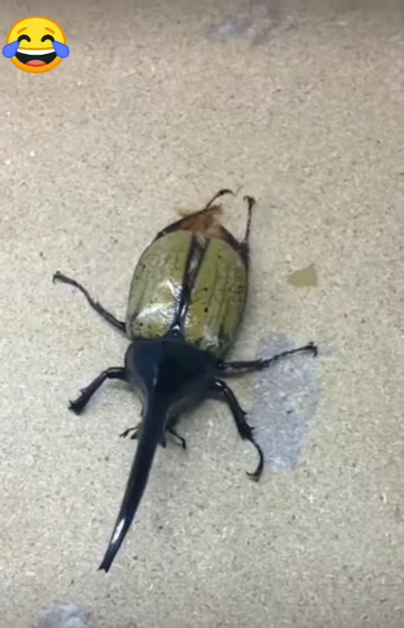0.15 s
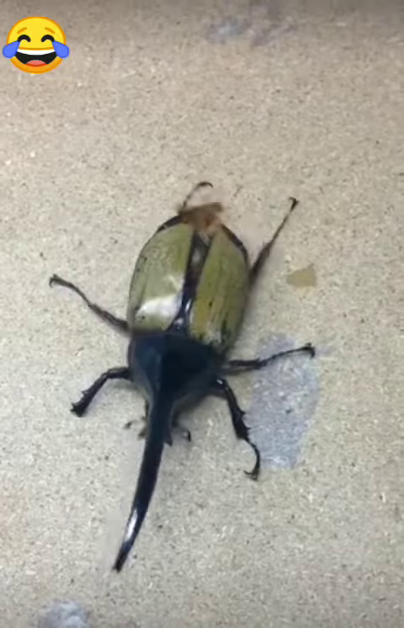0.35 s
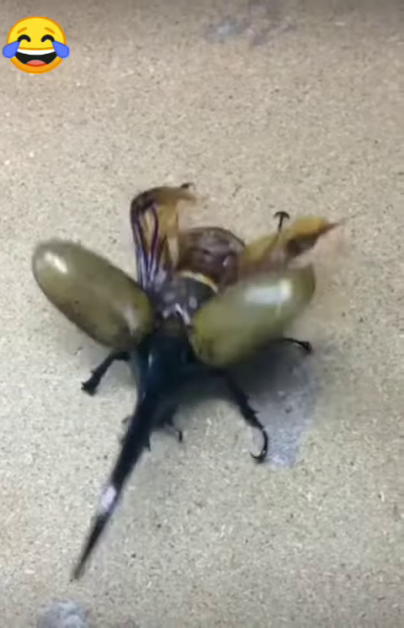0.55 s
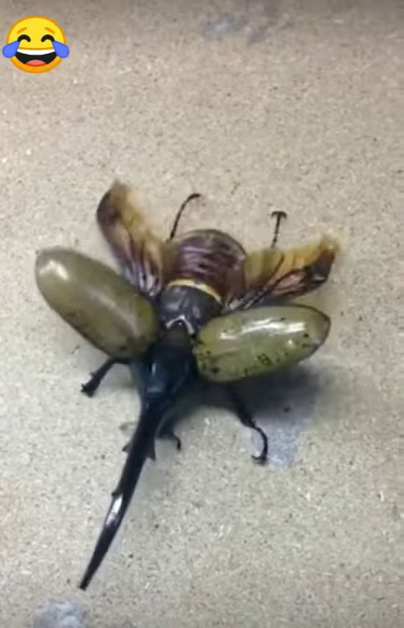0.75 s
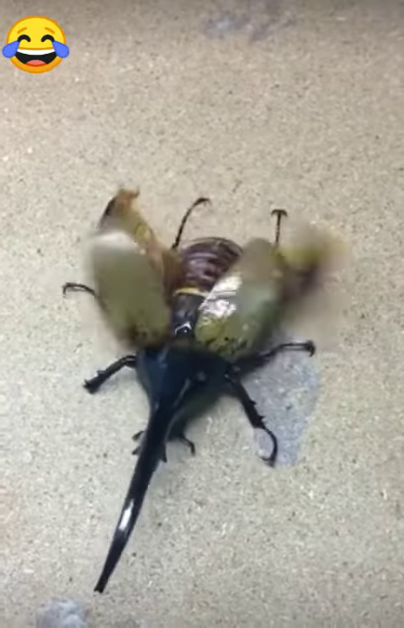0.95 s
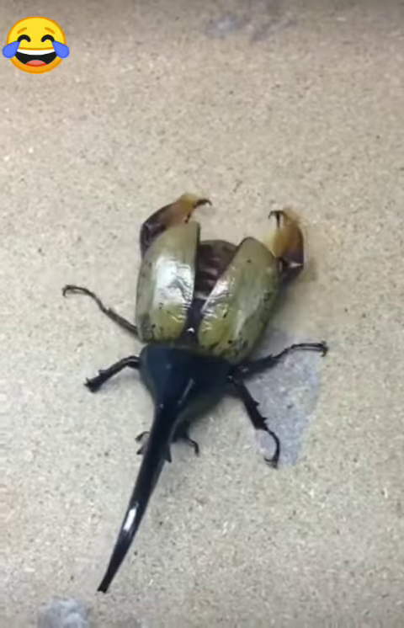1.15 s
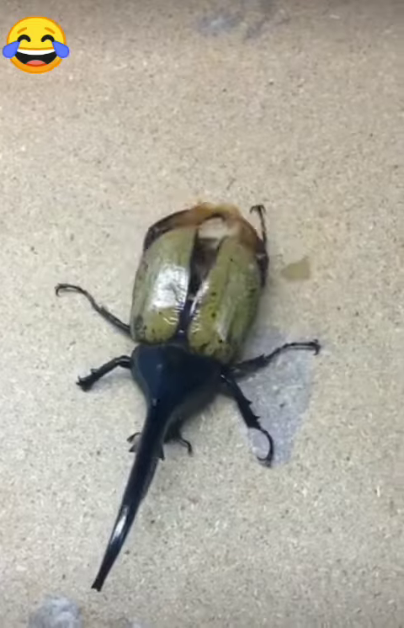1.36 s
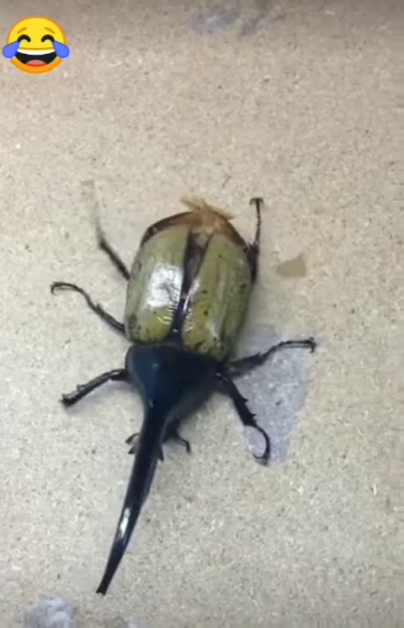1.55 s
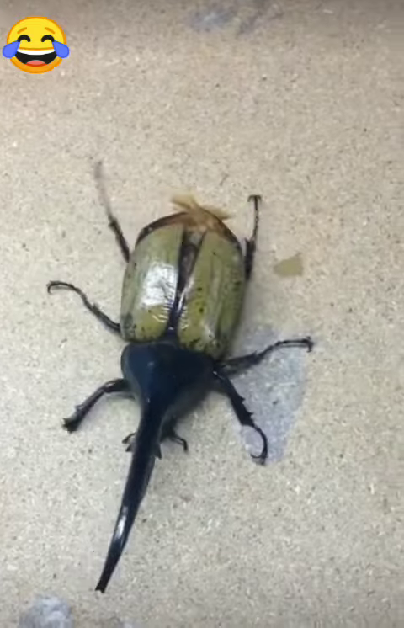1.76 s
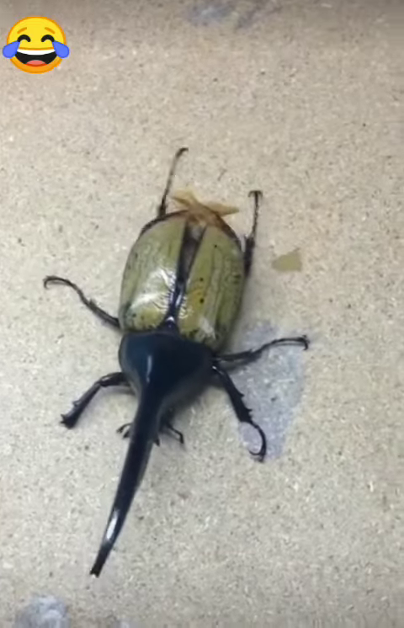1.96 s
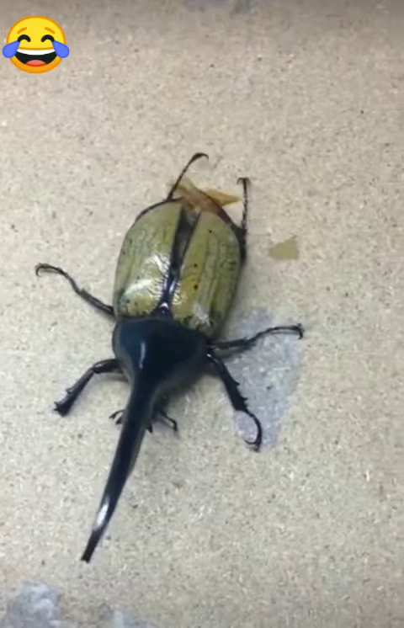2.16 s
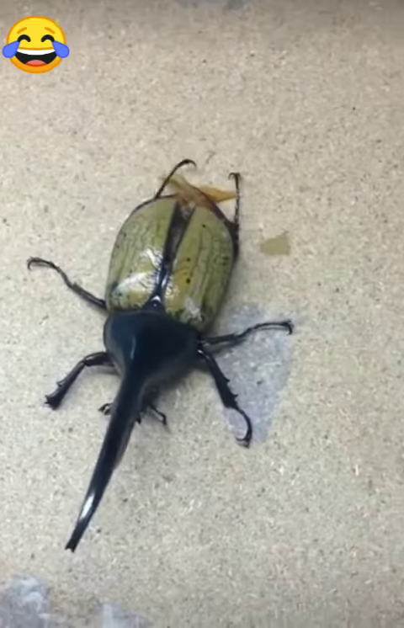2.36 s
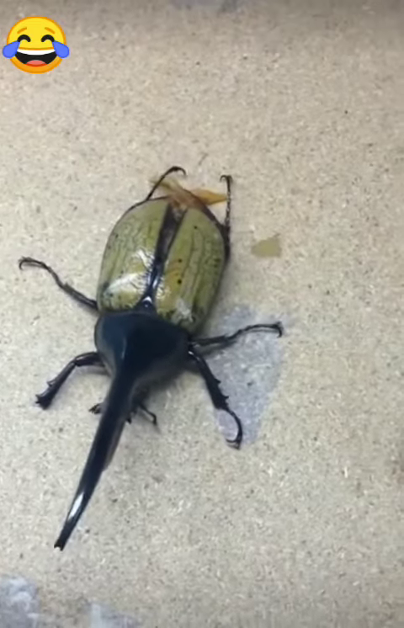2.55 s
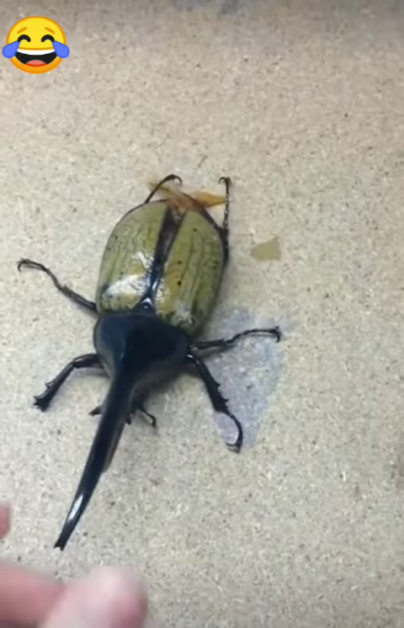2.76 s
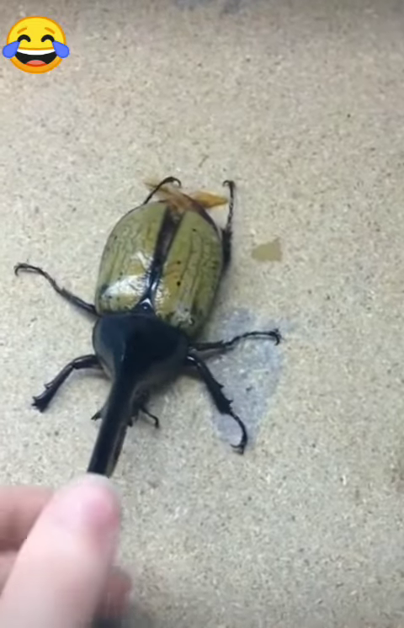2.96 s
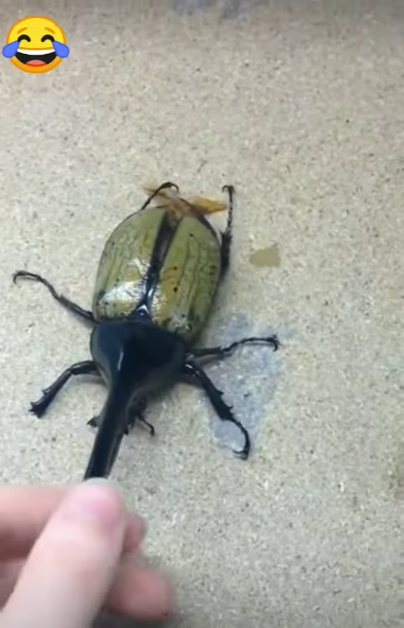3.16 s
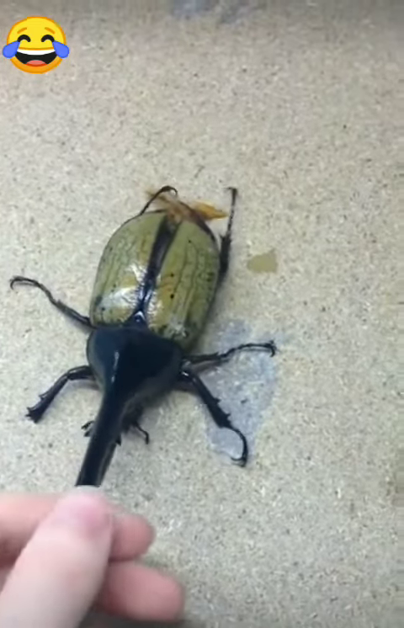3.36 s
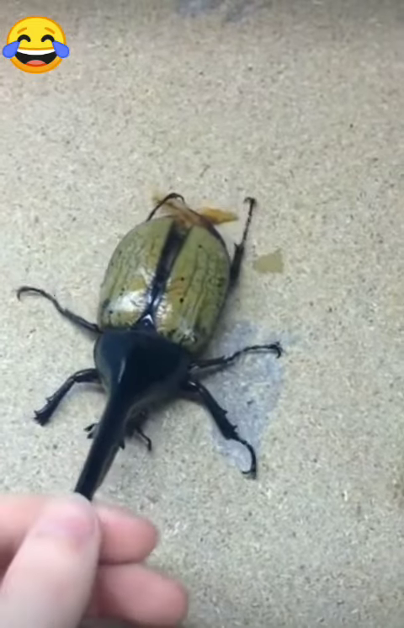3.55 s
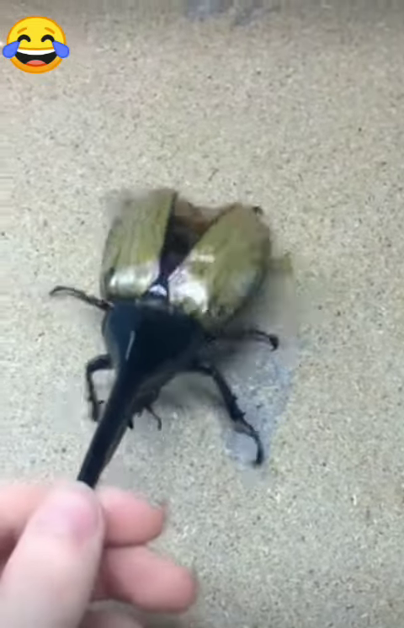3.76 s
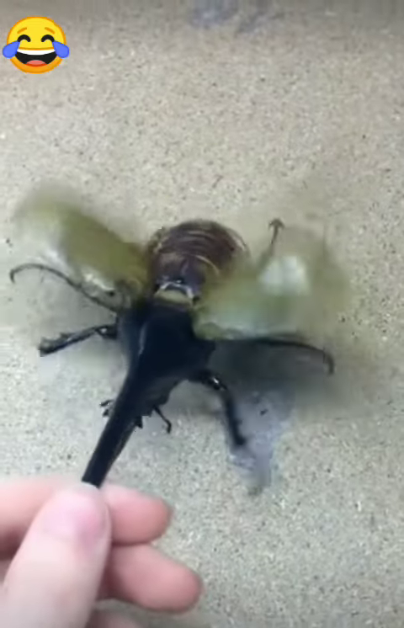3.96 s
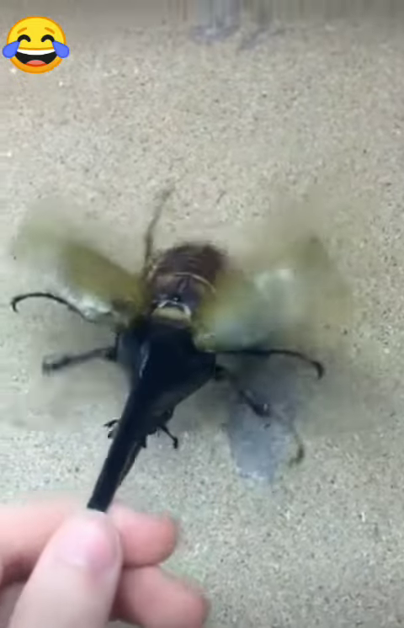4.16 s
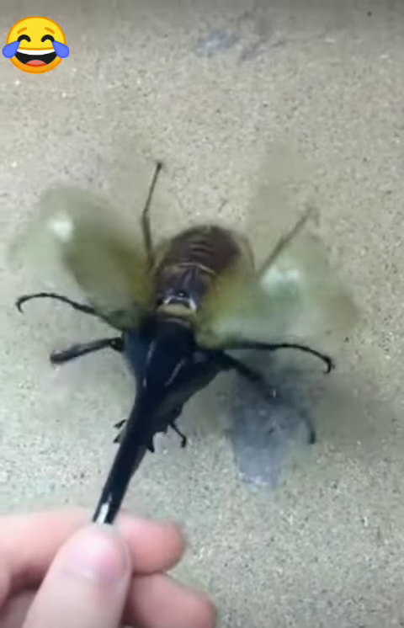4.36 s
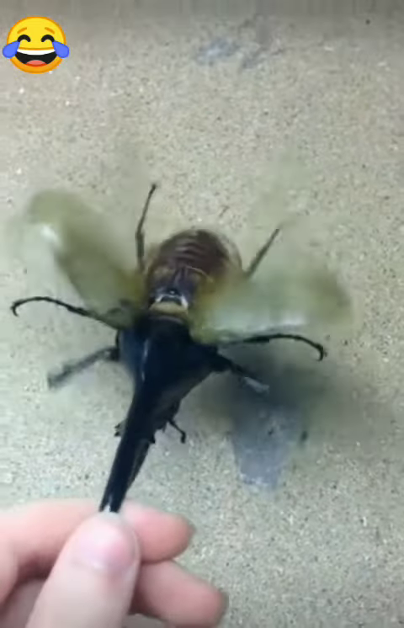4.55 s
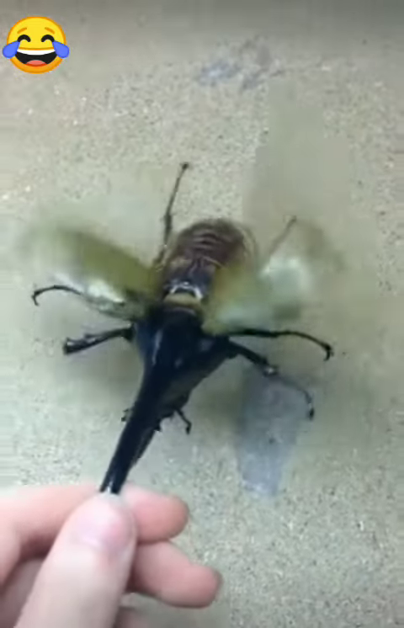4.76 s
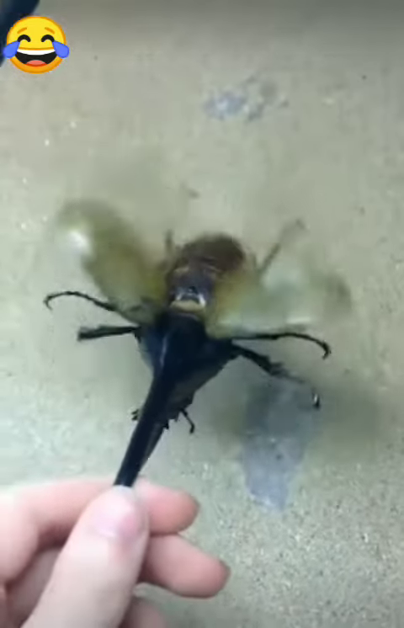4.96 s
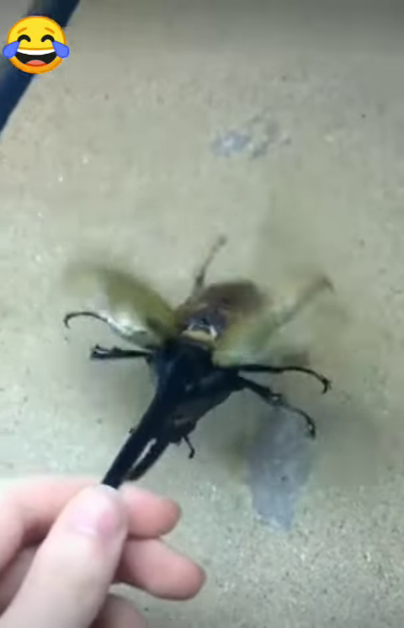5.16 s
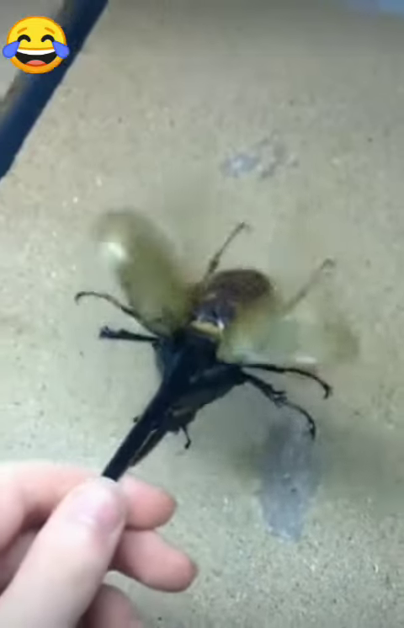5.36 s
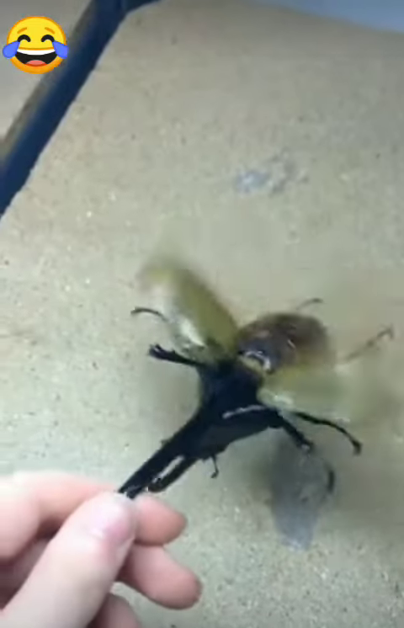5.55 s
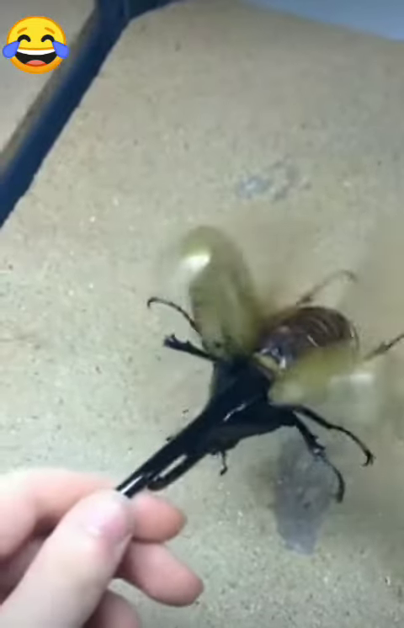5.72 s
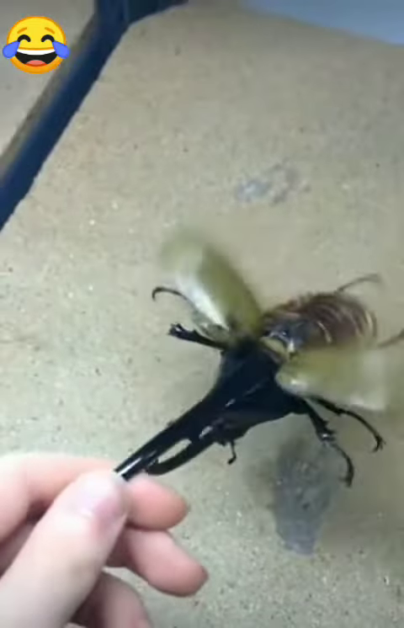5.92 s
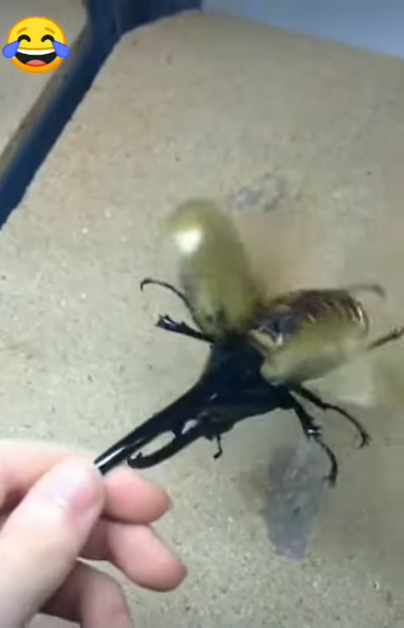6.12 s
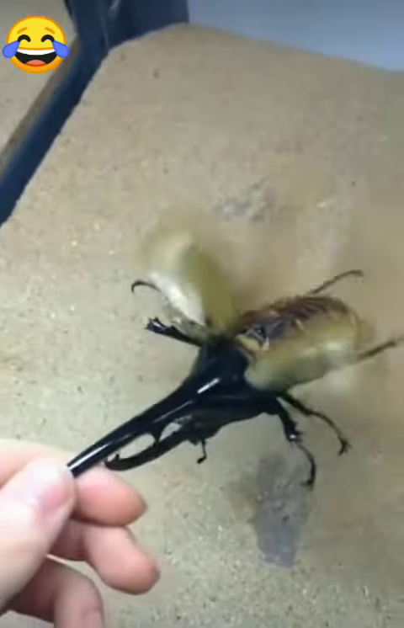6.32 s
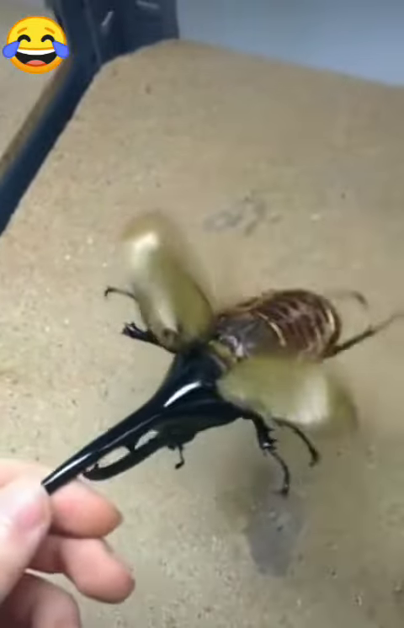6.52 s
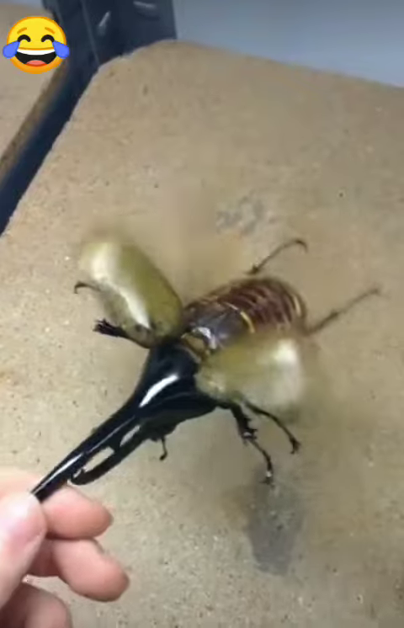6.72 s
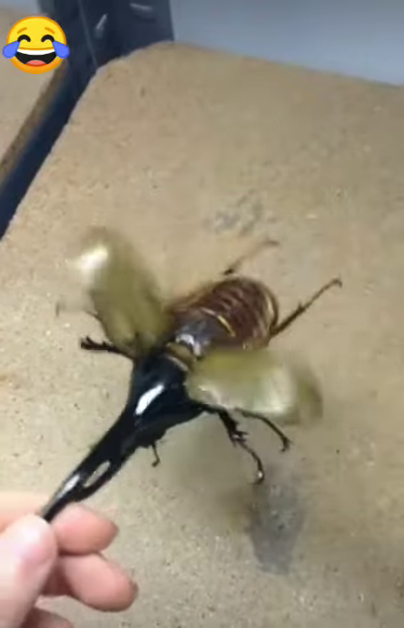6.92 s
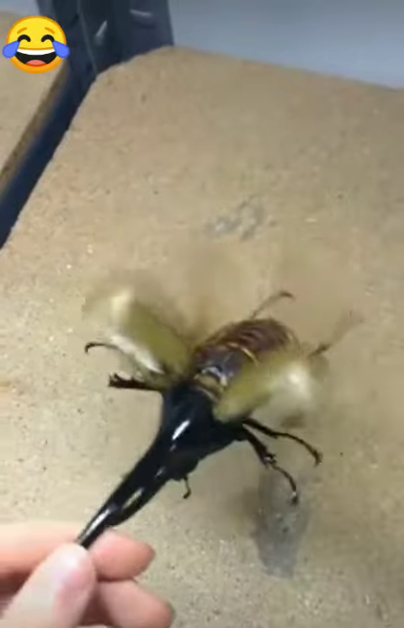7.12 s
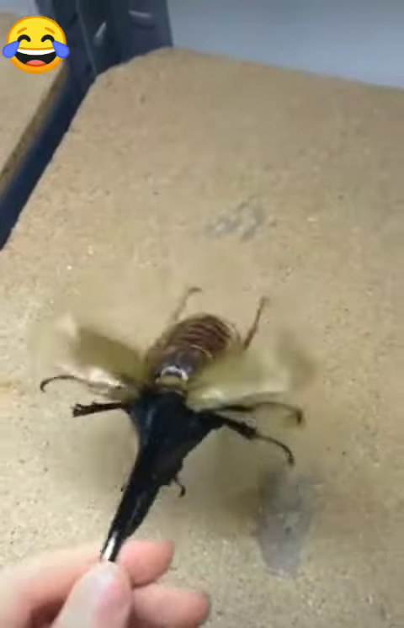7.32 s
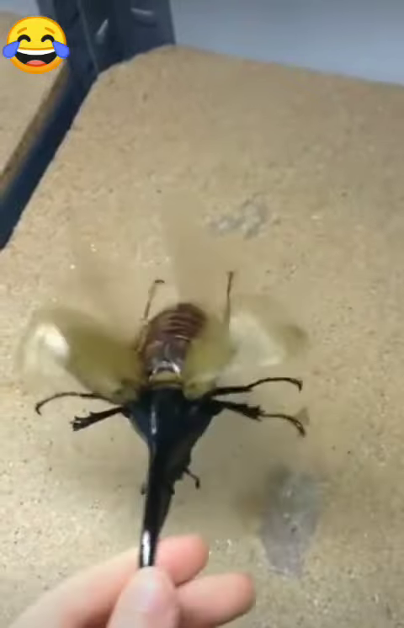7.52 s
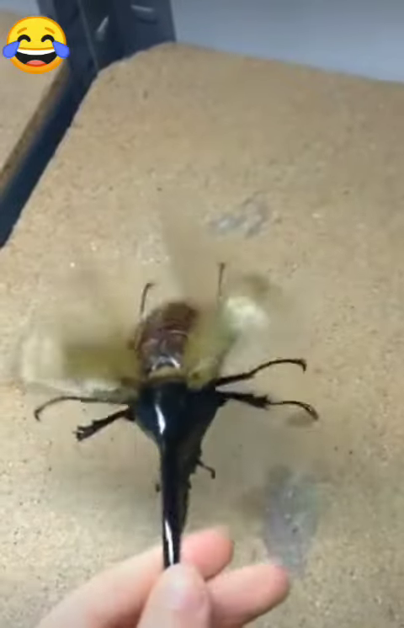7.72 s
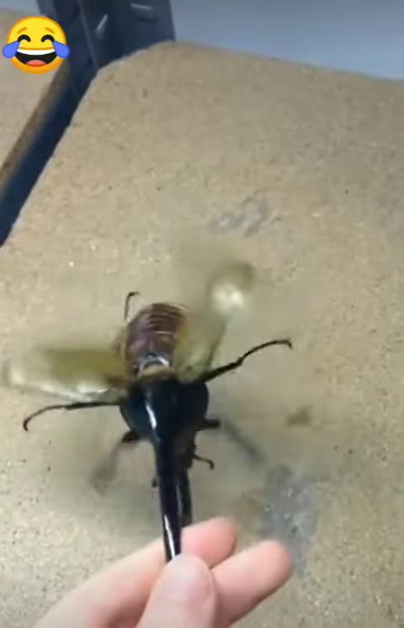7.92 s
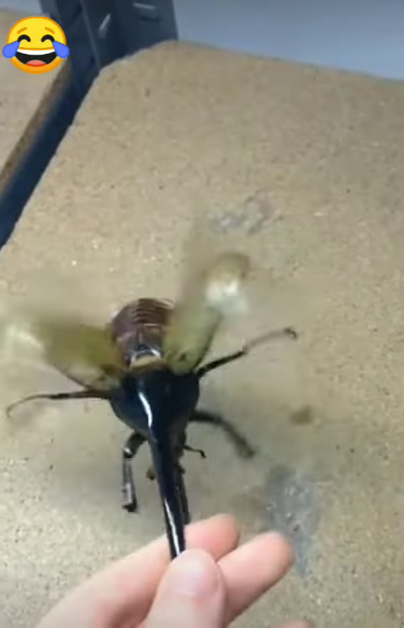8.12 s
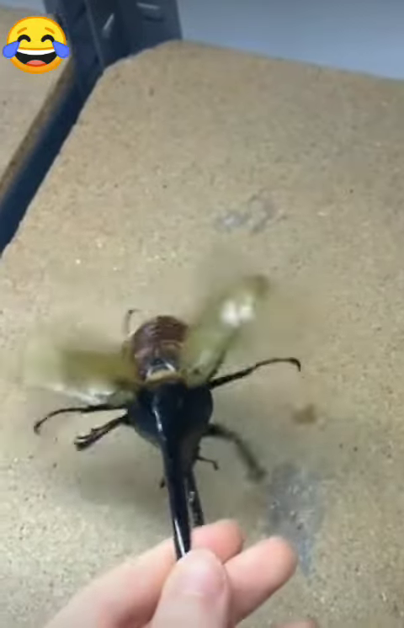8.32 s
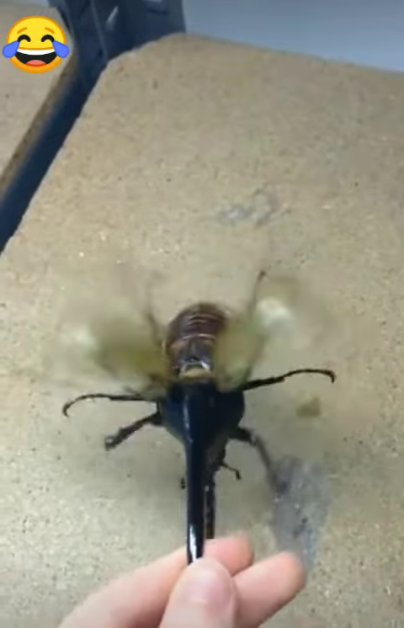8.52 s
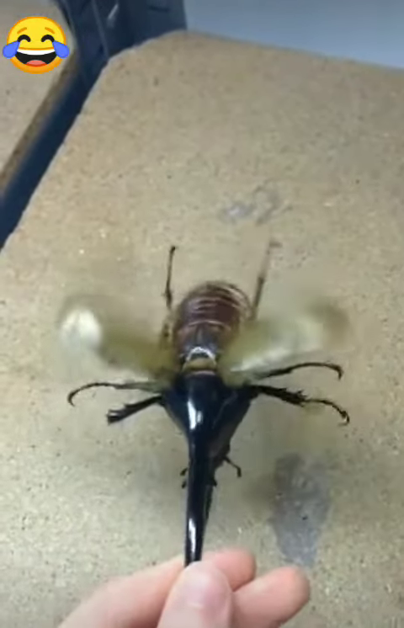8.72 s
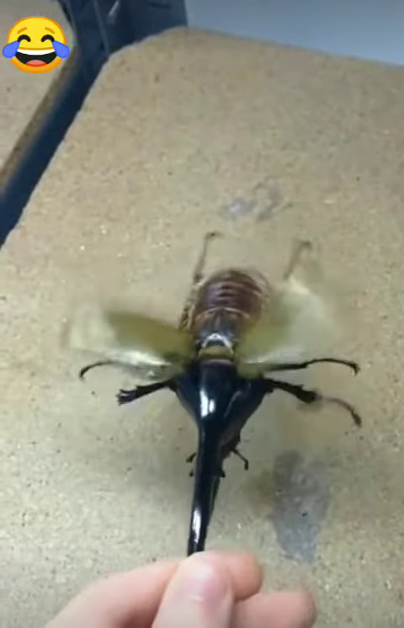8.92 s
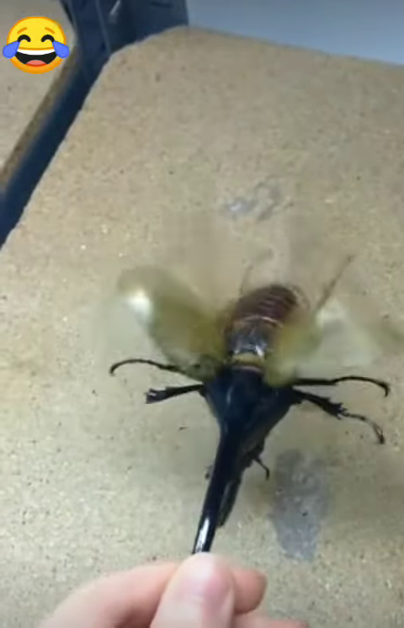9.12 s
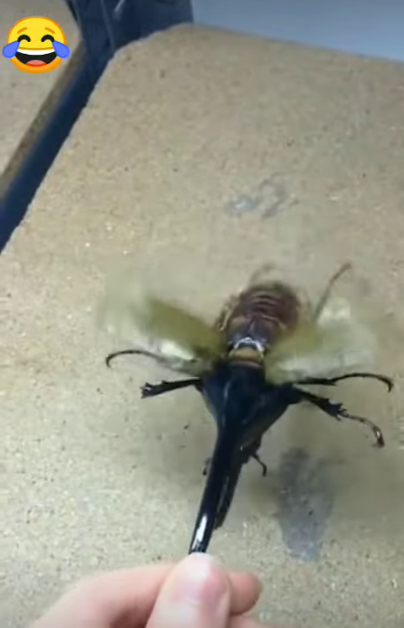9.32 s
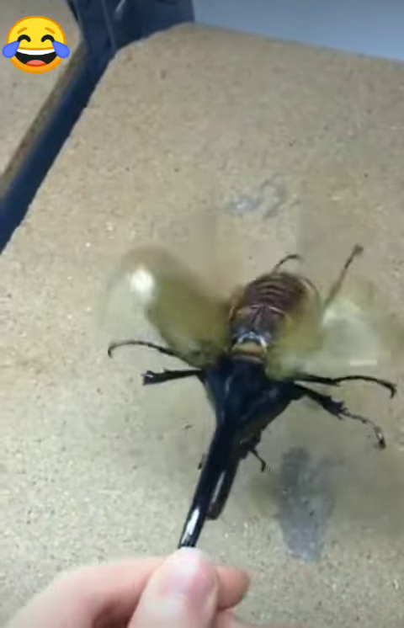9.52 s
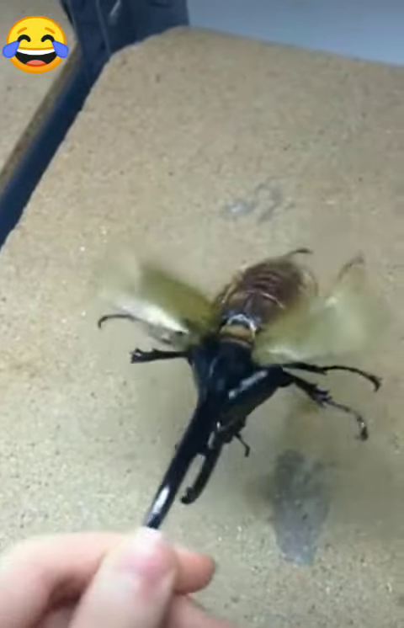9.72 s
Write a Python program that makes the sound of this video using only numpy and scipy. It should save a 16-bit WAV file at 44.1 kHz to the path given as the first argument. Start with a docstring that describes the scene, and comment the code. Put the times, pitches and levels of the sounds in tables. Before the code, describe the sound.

Faint room air and hum, then small dry ticks and a short rustle as a heavy beetle opens and shuts its wings. Quiet for over two seconds. Then light scrapes lead into a sudden rattling wing buzz, low and throbbing with crisp membrane slaps, close to the microphone. The early scratchiness fades as it is lifted; near eight seconds it stumbles, weakens, clicks, and picks up again.

```python
"""Beetle beating its wings

A large beetle on a board rustles its wing cases, then is lifted by the horn and beats its wings about 27 times a second.
Each beat is a pulse of low sine multiples, a noisy clap ringing in the wing resonances, and a softer turn of the wings.
At first the tips also brush the board. Ticks and scrapes are short rough noises, thuds are swells of low noise.
Behind lies a quiet room of air noise, whistling fan bands, rumble and mains hum."""
import sys
import numpy as np
from scipy import signal
from scipy.fft import rfft, irfft
from scipy.io import wavfile

SR = 44100
rng = np.random.default_rng(int(sys.argv[2]) if len(sys.argv) > 2 else 0)


def log_audio(samples):
    """Write samples as a 16-bit WAV file to the path given in sys.argv[1]."""
    # one column per channel
    frames = np.atleast_2d(samples).T
    # limit to full scale, then quantise
    limited = np.clip(frames, -1, 1)
    pcm = np.round(limited * 32767).astype(np.int16)
    wavfile.write(sys.argv[1], SR, pcm)


N = 435708
TIME = np.arange(N) / SR

# Spectrum of the clapping membranes. Each row: frequency in Hz, relative level in dB per Hz.
CLAP_COLOUR = [(350, -66), (600, -4.5), (1000, -5), (1250, -11), (2400, -4.5), (4500, -9), (6000, -10.5),
               (8000, -10.5), (13000, -16), (16000, -13.5)]
# Bright spectrum of rubbing, brushing and ticking. Each row: frequency in Hz, relative level in dB per Hz.
BRUSH_COLOUR = [(240, -31), (400, -7.5), (512, -5), (789, -3), (1200, -7.5), (1530, 0.5), (4800, -0.5),
                (9920, 1.5), (14600, -6.5), (16000, 2.5)]
# How the beetle is held. Each row: time in seconds, how far it is turned away (signed, no unit),
# closeness over the board (0 to 1).
POSE = [(3.75, 0.15, 0.74), (4.4, 0.18, 0.68), (4.48, 0.73, 0.34), (4.85, -1.35, 0.26), (5.9, 0.72, 0.34),
        (7.3, 1, 0.13), (7.7, -0.099, 0.6), (7.9, -0.38, 0.37), (8.35, 0.21, 0.28), (8.6, 0.6, 0.43),
        (9.88, 1, 0.16)]


def amp(db):
    """Decibels to gain."""
    return 10 ** (np.asarray(db) / 20)


def rms_one(x):
    """Scaled to rms 1."""
    return x / np.sqrt(np.mean(x ** 2) + 1e-20)


def in_time(rows):
    """Columns of a curve, interpolated at every sample."""
    s, *columns = np.transpose(rows)
    return [np.interp(TIME, s, column) for column in columns]


def noise(colour):
    """Steady noise with a given spectrum, rms 1."""
    hz, db = np.transpose(colour)
    grid = np.maximum(np.fft.rfftfreq(N, 1 / SR), 1)
    gain = amp(np.interp(np.log(grid), np.log(hz), db))
    return rms_one(irfft(rfft(rng.standard_normal(N)) * gain, N))


def band(x, low_hz, high_hz):
    """Gentle band-pass."""
    sos = signal.butter(2, [low_hz, min(high_hz, .45 * SR)], "band", fs=SR, output="sos")
    return signal.sosfilt(sos, x)


def resonances(x, peaks):
    """Parallel two-pole resonators with alternating signs."""
    out = 0
    for k, (hz, width, db) in enumerate(peaks):
        r = np.exp(-np.pi * width / SR)
        poles = [1, -2 * r * np.cos(2 * np.pi * hz / SR), r * r]
        out = out + (-1) ** k * amp(db) * signal.lfilter([1 - r, 0, r - 1], poles, x)
    return out


def grain(rate_hz, spread_db):
    """Random gain: slow rates make a sound waver, fast ones make a noise crackle."""
    r = np.exp(-2 * np.pi * rate_hz / SR)
    wander = rms_one(signal.lfilter([1], [1, -2 * r, r * r], rng.standard_normal(N)))
    return amp(spread_db * wander)


def crackle(gate, colour, rough_db):
    """Rough contact: coloured noise with a fast random gain, shaped by a gate."""
    return gate * grain(470, rough_db) * noise(colour)


def room():
    """Air noise, whistling fan bands, low rumble with thuds, and mains hum that comes and goes."""
    # Rumble and hum over time. Each row: time in seconds, rumble in dB, relative hum level in dB.
    room_levels = [(0, -69, -82), (1.7, -68, -89), (1.78, -81, -74), (2.3, -69, -68.5), (3.0, -69.5, -66.5),
                   (9.9, -61, -93)]
    # Dull thuds through the board. Each row: start in seconds, relative level in dB, decay t60 in seconds.
    thuds = [(0.199, -49, 0.15), (0.469, -36, 0.18), (0.519, -45, 0.12), (0.998, -46, 0.22),
             (1.049, -48, 0.18)]
    # Partials of the mains hum. Each row: frequency in Hz, relative level in dB.
    hum_partials = [(50.1, -29), (100.1, 1), (200.1, -12.5), (299.5, -13.5), (350, -17)]
    # Spectrum of the room air. Each row: frequency in Hz, relative level in dB per Hz.
    air_colour = [(71, -52), (120, -18), (140, -23), (301, -15), (656, -17.5), (1010, -17), (1580, -15.5),
                  (2430, -13.5), (4320, -16.5), (5300, -18), (14400, -29), (16000, -21)]
    # Whistling bands of a fan. Each row: frequency in Hz, width in Hz, relative level in dB.
    fan_bands = [(1274, 15, -9), (1581, 83, 4.5), (1835, 34, 0), (2160, 30, -32), (2660, 380, -22),
                 (2860, 76, -26), (3195, 29, -6.5), (3440, 68, 1.5), (3744, 69, -4), (3940, 18, 3.5),
                 (4240, 51, -12), (4470, 34, 5.5), (4640, 45, -14), (4740, 89, 0)]

    rumble_db, hum_db = in_time(room_levels)
    low = rms_one(band(rng.standard_normal(N), 43, 136))
    thud_gain = 0
    for s, db, t60 in thuds:
        fade_db = -60 * np.maximum(TIME - s, 0) / t60
        thud_gain = thud_gain + amp(db - 9 + fade_db) * np.clip((TIME - s) / 0.016, 0, 1)
    hum = sum(amp(db + 7) * np.sin(2 * np.pi * hz * TIME) for hz, db in hum_partials)
    air = noise(air_colour)
    air = air + amp(9.5) * resonances(air, fan_bands)
    rumble_gain = amp(rumble_db) * grain(2.4, 2.0)
    return amp(-57.5) * grain(16, 0.86) * air + (rumble_gain + thud_gain) * low + amp(hum_db) * hum


def ticks():
    """Short dying noises, broad with a second band around each one's centre."""
    # Legs and wing cases ticking, and at 3.737 s the first brush of the wing tips.
    # Each row: start in seconds, relative level in dB, centre in Hz, decay t60 in seconds,
    # level of the band at the centre in dB.
    tick_rows = [(0.239, -36.5, 3780, 0.13, 0), (0.3008, -27.5, 10500, 0.072, -6),
                 (0.339, -28, 2390, 0.031, 11), (0.5038, -40.5, 1570, 0.068, -6),
                 (0.625, -43, 1650, 0.045, -3), (0.852, -22.5, 5530, 0.053, 4),
                 (0.8644, -37, 7230, 0.064, 5), (0.8995, -23.5, 5070, 0.048, 0),
                 (0.911, -36, 4280, 0.12, 4), (1.1606, -30, 4300, 0.061, 1), (1.331, -43, 1810, 0.076, 7),
                 (3.6113, -28, 2160, 0.066, -6), (3.7065, -34, 4670, 0.09, -1),
                 (3.7229, -32, 2320, 0.11, -2), (3.7374, -14.5, 7900, 0.081, -1),
                 (7.975, -38, 2290, 0.045, -5), (7.987, -20, 2800, 0.055, 14.5)]
    out, bright = np.zeros(N), noise(BRUSH_COLOUR)
    age = TIME[:6000]
    for s, db, hz, t60, lift_db in tick_rows:
        i = round(s * SR)
        decay = amp(-60 * age / t60) + 1.3 * amp(-60 * age / 0.018)   # a tail and a sharper start
        puff = bright[i:i + 6000] * decay * np.minimum(age / 0.0021, 1)
        broad = band(puff, hz * 0.11, SR)
        centre = band(puff, hz * 0.85, hz * 1.17)
        out[i:i + 6000] += amp(db - 9.5) * (broad + amp(lift_db) * centre)
    return out


def wing_ring(x):
    """Resonances of wings and cases, whose strengths follow the pose and wander a little."""
    # Each row: frequency in Hz, width in Hz, level in dB, dB gained as the beetle turns away.
    membrane_modes = [(556, 73, -9, 5), (764, 72, 7, 1.5), (1032, 58, 3.5, -2.5), (1519, 125, 3, -2.5),
                      (1990, 170, 0.5, 5.5), (2446, 155, 8, 1), (2880, 430, -3.5, 3), (3600, 200, 4, 1.7),
                      (4480, 790, -1.5, 0), (7580, 1260, 1, 1.5), (13250, 2200, -9.5, 2)]
    turned = in_time(POSE)[0]
    out = 0
    for k, (hz, width, db, lean_db) in enumerate(membrane_modes):
        drive = x * amp(lean_db * turned) * grain(2.3, 1.2)
        out = out + (-1) ** k * resonances(drive, [(hz, width, db)])
    return out


def membrane(gate, ring_db, rough_db):
    """Rubbing noise, heard directly and through the wing resonances."""
    rub = crackle(gate, BRUSH_COLOUR, rough_db)
    return rub + amp(ring_db) * wing_ring(rub)


def scrapes():
    """Wing cases sliding open: rough rubbing that rings in their resonances."""
    # Each row: start in seconds, length in seconds, relative level in dB.
    slides = [(0.285, 0.066, -50), (1.108, 0.057, -58.5), (3.544, 0.084, -55), (3.606, 0.028, -50.5)]
    rise_s, t60_s = 0.0069, 0.15
    gate = 0
    for s, length, db in slides:
        fade_db = -60 * np.maximum(TIME - s - length, 0) / t60_s
        gate = gate + amp(db + fade_db) * np.clip((TIME - s) / rise_s, 0, 1)
    return membrane(gate, ring_db=6.5, rough_db=2.0)


def beat_count():
    """Wing speed summed into beats at every sample, zero at the first clap."""
    # Speed flags before the lull and picks up after it. Each row: time in seconds, beats per second.
    beat_rate = [(3.75, 29.039), (4.25, 28.487), (4.5, 27.813), (5.31, 27.84), (6.04, 26.819),
                 (6.32, 27.173), (7.08, 27.129), (7.41, 26.559), (7.85, 23.851), (8.07, 25.237),
                 (8.34, 25.591), (8.41, 28.082), (8.71, 28.231), (9.88, 26.865)]
    first_clap_s = 3.7535
    count = np.cumsum(in_time(beat_rate)[0]) / SR
    return count - np.interp(first_clap_s, TIME, count)


def kicks(at, delay_s, spread_db, jitter_s):
    """One impulse a beat, at a share of it plus a delay; each differs a little in time and size."""
    chance = rng.standard_normal((170, 2))
    on_beat = np.interp(np.arange(170) + at, beat_count(), TIME, right=99)   # 99 s: past the end
    when = on_beat + delay_s + jitter_s * chance[:, 0]
    out, inside = np.full(N, 1e-18), when < TIME[-1]
    out[(when[inside] * SR).astype(int)] = amp(spread_db * chance[inside, 1])
    return out


def bursts(at, rise_s, t60, spread_db, jitter_s):
    """Envelope that jumps up once a beat and dies away."""
    rise, fall = np.exp(-1 / (rise_s * SR)), amp(-60 / (t60 * SR))
    dying = signal.lfilter([1], [1, -fall], kicks(at, 0, spread_db, jitter_s))
    return signal.lfilter([1 - rise], [1, -rise], dying)


def brushing_db():
    """Tips reach the board steadily, then the level falls quickly at the lift and more slowly after."""
    lift_s, lift_db_per_s, lift_loss_db, after_db_per_s = 4.366, 43.5, 27, 28
    since = np.maximum(TIME - lift_s, 0)
    return -25.5 - np.minimum(lift_db_per_s * since, lift_loss_db + after_db_per_s * since)


def brush():
    """Wing tips brush the board in each beat, heard directly and through the membranes."""
    # Each row: share of the beat, relative level in dB, decay t60 in seconds.
    contacts = [(0.359, 2, 0.08), (.60, -0.5, 0.012)]
    strokes = sum(amp(db + 2) * bursts(at, 0.00081, t60, 0.73, 0.0007) for at, db, t60 in contacts)
    return membrane(amp(brushing_db()) * strokes, ring_db=3.0, rough_db=3.5)


def clap_ring():
    """Early claps ring more at 1.5 and 2.3 kHz, fading with the brushing."""
    gate = amp(brushing_db() - 1) * bursts(0.032, 0.00034, 0.011, 3.6, 0.00081)
    strike = crackle(gate, BRUSH_COLOUR, rough_db=5.5)
    return amp(5.5) * resonances(strike, [(1550, 290, 10.8), (2320, 250, 1.3)])   # Hz, width Hz, dB


def air_rush(clap_db):
    """Rush of air following the clap level slightly, plus air stirred on the board with the brushing."""
    # Spectrum of the rush. Each row: frequency in Hz, relative level in dB per Hz.
    rush_colour = [(60, -45), (150, 3), (250, -4.5), (700, -10), (1020, -13), (1300, -7), (2420, -8),
                   (5940, -10.5), (7970, -13.5), (14600, -19), (16000, -16)]
    rush_db = -46 + 0.1 * (clap_db - clap_db.max())
    stir_db = brushing_db() - 13
    return (amp(rush_db) + amp(stir_db)) * grain(67, 2.9) * noise(rush_colour)


def air_push(push_db, snap_db):
    """Multiples of the beat, all passing zero together near the clap: a pulse with ripples either side."""
    # Levels hovering free. Each row: multiple of the beat rate, relative level in dB.
    free_orders = [(1, -27), (2, -13), (3, -10.5), (4, -1), (5, -20), (6, -2.5), (7, -9.5), (8, -24.5),
                   (9, -15), (10, -18), (11, -12), (12, -10.5), (13, -6), (14, -6.5), (15, -12), (16, -10),
                   (17, -9.5), (18, -11), (19, -9), (20, -11.5), (21, -20), (22, -16), (23, -38), (24, -16)]
    # Levels close over the board. Each row: multiple of the beat rate, relative level in dB.
    board_orders = [(1, -32), (2, -6.5), (3, -10.5), (4, -3), (5, 10.5), (6, -16), (7, -0.5), (8, -10),
                    (9, -9), (10, -21), (11, -4), (12, -14.5), (13, -30), (14, -18), (15, -20), (16, -30),
                    (17, -34), (18, -41), (19, -26), (20, -22), (21, -6.5), (22, -8), (23, -45), (24, -24)]
    timing_wander = .004 * np.log(grain(15, 6.0))   # in beats
    angle = 2 * np.pi * (beat_count() - .036 + timing_wander)
    near = np.clip(in_time(POSE)[1], 0, 1)    # the board's echo changes the mix
    low = high = 0
    for (k, free_db), (_, board_db) in zip(free_orders, board_orders):
        level = amp(free_db + near * (board_db - free_db)) * grain(3.4, 0.97)
        tone = level * np.sin(k * angle)
        if k <= 10:
            low = low + tone
        else:
            high = high + tone
    swirl = amp(-16) * rms_one(band(rng.standard_normal(N), 60, 312))
    return amp(push_db) * (rms_one(low) + swirl) + amp(snap_db) * rms_one(high)


def wing_turn(clap_db):
    """Wings turn at the bottom of the beat: a crackle softer than the clap, as the membranes ring flipping over."""
    gate = amp(clap_db - 15) * bursts(0.522, 0.00035, 0.027, 1.6, 0.00056)
    flip = crackle(gate, BRUSH_COLOUR, rough_db=3.0)
    return flip + resonances(flip, [(3000, 390, 9.5)])   # Hz, width Hz, dB


def vein_knocks(clap_db):
    """Veins of the two wings meet one after another; the same row every beat makes claps sound alike."""
    # Each row: delay in seconds, relative level in dB.
    veins = [(0, 0), (.00205, -2.5), (.0041, -7), (.00615, -24)]
    return -amp(clap_db + 9) * sum(amp(db) * kicks(.004, delay, 2.7, .00003) for delay, db in veins)


def clap(clap_db):
    """Membranes slap together and ring with the vein contacts, then rustle on."""
    slap_gate = amp(clap_db - 8.0) * bursts(-0.013, 0.00065, 0.039, 1.0, 0.00024)
    slap = crackle(slap_gate, CLAP_COLOUR, rough_db=2.0)
    flutter_gate = amp(clap_db - 18.5) * bursts(0.23, 0.025, 0.078, 1.4, 0.00075)
    flutter = crackle(flutter_gate, CLAP_COLOUR, rough_db=3.5)
    return slap + amp(5.5) * wing_ring(slap + vein_knocks(clap_db)) + flutter


def flight():
    """All sounds of the beating wings, which move air, brush the board, turn and clap."""
    # Each row: time in seconds, air push in dB, level of its multiples above the 10th in dB,
    # relative clap level in dB.
    wing_levels = [(3.75, -41, -54, -31), (3.9, -48.5, -60, -23.5), (4.0, -38, -49, -24.5),
                   (4.5, -36, -45.5, -24.5), (4.85, -36, -44.5, -20), (5.9, -37.5, -44, -23.5),
                   (6.4, -35.5, -44, -24), (7.12, -37.5, -46.5, -24.5), (7.28, -39, -56, -24),
                   (7.62, -42.5, -54, -26.5), (7.98, -50, -65, -32), (8.03, -56, -64, -46),
                   (8.12, -51, -59, -34.5), (8.23, -56, -58, -37), (8.33, -39.5, -64, -26.5),
                   (8.45, -37.5, -48.5, -25.5), (8.95, -35.5, -44.5, -25), (9.88, -37.5, -47.5, -24.5)]
    push_db, snap_db, clap_db = in_time(wing_levels)
    beating = np.clip((TIME - 3.735) / 0.0054, 0, 1)
    filling = np.clip((TIME - 3.74) / 0.13, 0, 1)    # the first strokes are shallow and move little air
    air = filling * air_push(push_db, snap_db) + air_rush(clap_db)
    claps = clap(clap_db) + clap_ring()
    return beating * (air + brush() + wing_turn(clap_db) + claps)


def scene():
    """Room, beetle on the board and wings in flight, summed to one channel."""
    return (room() + ticks() + scrapes() + flight())[None]


def record(dry):
    """Peaks are rounded by soft overload, the top is cut steeply."""
    overload_level, cutoff_hz = .42, 16500
    rounded = overload_level * np.tanh(dry / overload_level)
    return signal.sosfilt(signal.cheby2(10, 66, cutoff_hz, fs=SR, output="sos"), rounded)


dry = scene()
out = record(dry)
log_audio(out)
```